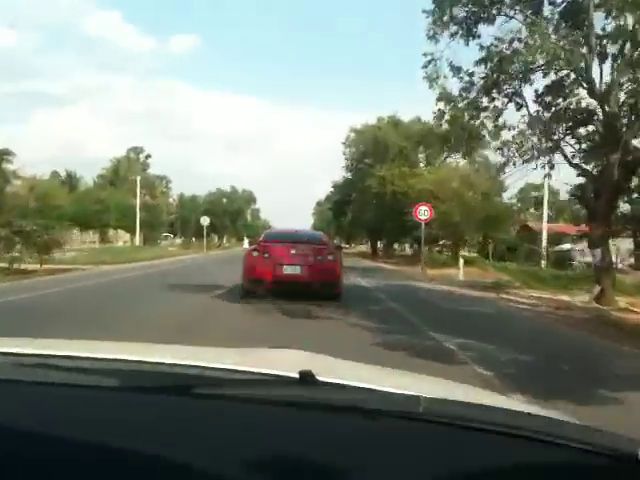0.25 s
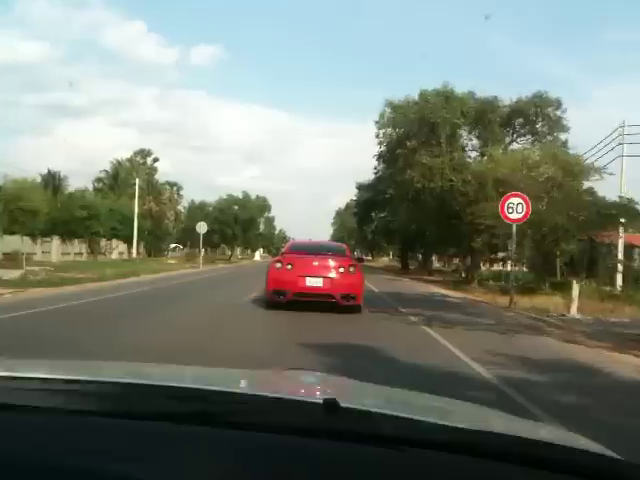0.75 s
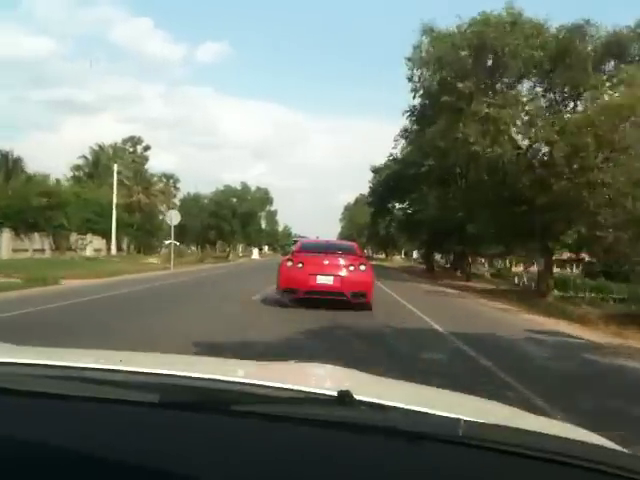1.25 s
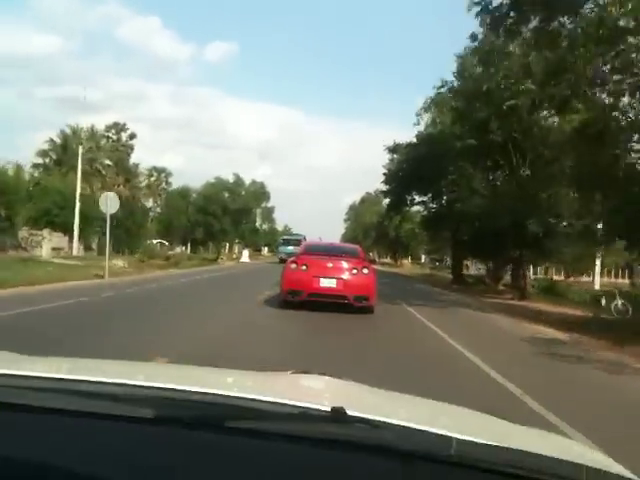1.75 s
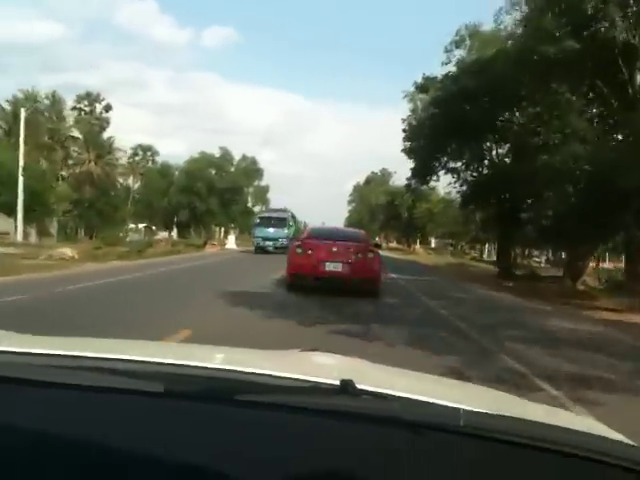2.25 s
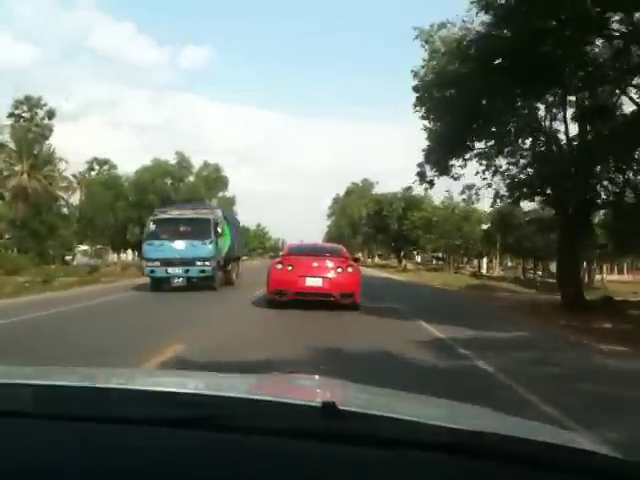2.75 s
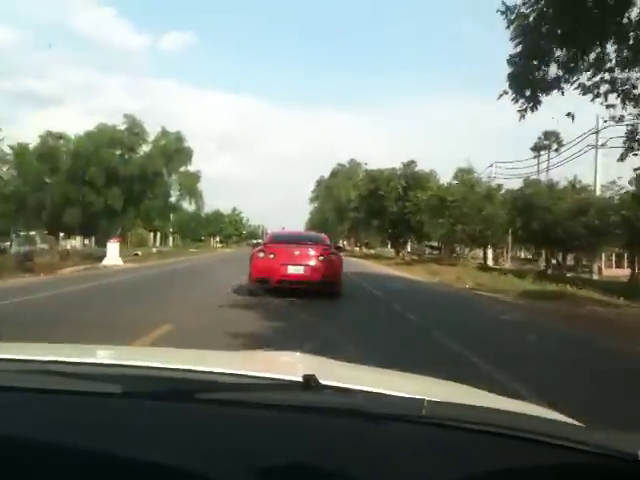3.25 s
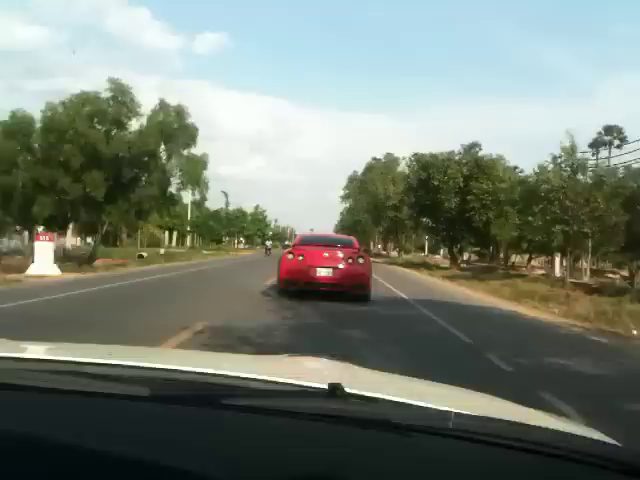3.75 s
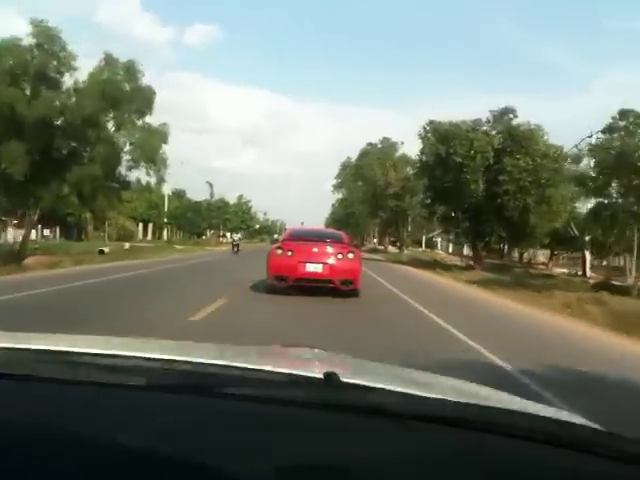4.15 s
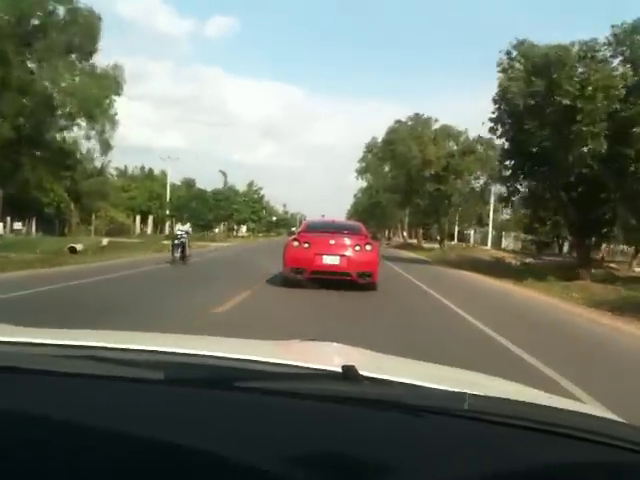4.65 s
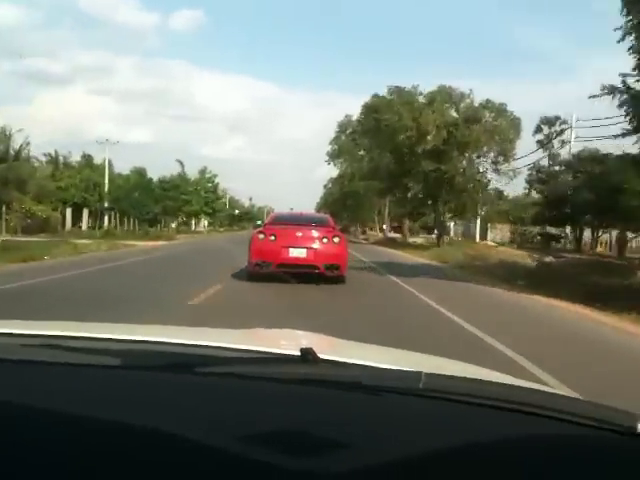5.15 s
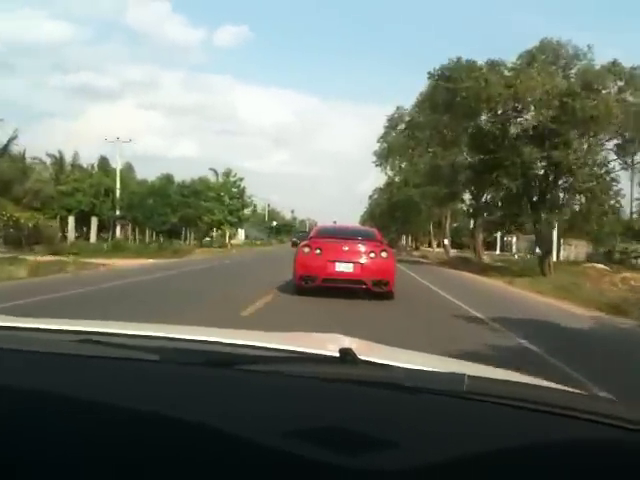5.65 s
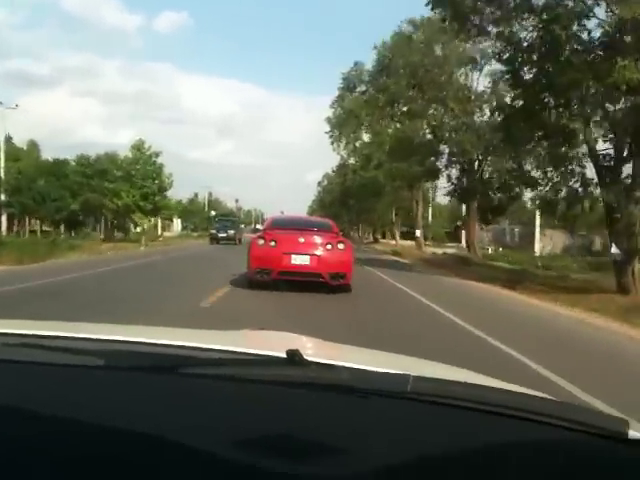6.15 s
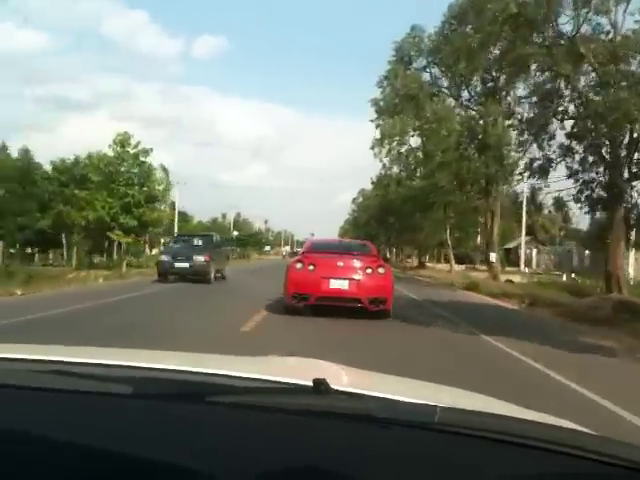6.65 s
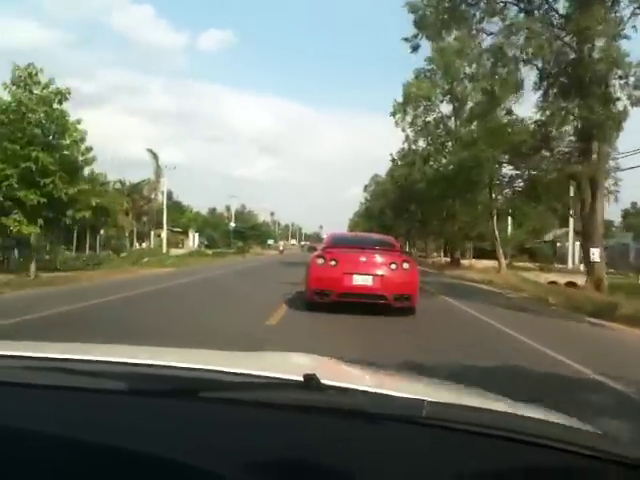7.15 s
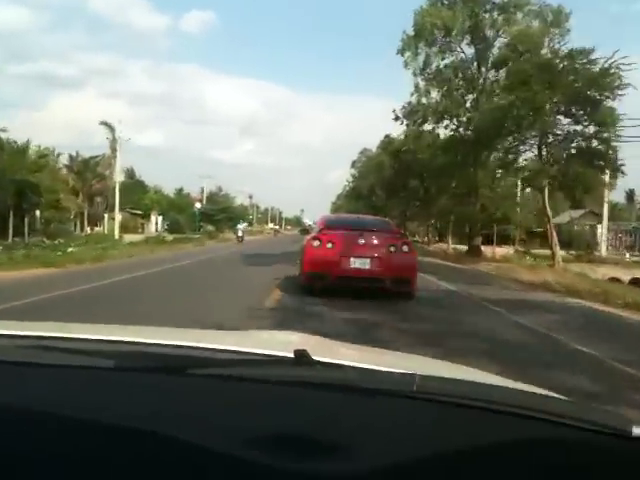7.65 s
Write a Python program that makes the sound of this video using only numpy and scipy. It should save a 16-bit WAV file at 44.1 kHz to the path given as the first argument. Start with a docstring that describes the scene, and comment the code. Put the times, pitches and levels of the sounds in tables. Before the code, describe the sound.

Car cabin on a country road: droning engine slowly rising in pitch, soft tyre roar, irregular thumps, suspension knocks and small trim ticks.

```python
"""Car interior on a country road

Inside a car that gathers a little speed, the engine hums in harmonics of its firing rate and a gear whines.
Tyres rumble and hiss as shaped noise; rough patches of asphalt excite short, heavily damped body jolts.
Suspension contacts clack, panels crack together, and hard trim snaps, ticks and rubs as it slips.
A few puffs of air, enveloped noise, cross the microphone."""
import sys
import numpy as np
from scipy import signal
from scipy.fft import rfft, irfft, next_fast_len
from scipy.io import wavfile
from scipy.ndimage import uniform_filter1d, map_coordinates

SR = 44100
rng = np.random.default_rng(int(sys.argv[2]) if len(sys.argv) > 2 else 0)


def wav_out(sig):
    """Save sig, one row per channel (or a flat mono array), as 16-bit PCM at SR to the path in sys.argv[1]."""
    wavfile.write(sys.argv[1], SR, np.round(np.clip(np.atleast_2d(sig).T, -1, 1) * 32767).astype(np.int16))


N = 348814  # samples


def amp(db):
    """Decibels to amplitude ratio."""
    return 10 ** (np.asarray(db) / 20)


def unit(x):
    """Normalisation to an rms of 1."""
    return x / np.sqrt(np.mean(x ** 2) + 1e-20)


def curves(rows):
    """Linear interpolation in time: one value per sample for each column after the time."""
    s, *columns = np.transpose(rows)
    t = np.arange(N) / SR
    return [np.interp(t, s, column) for column in columns]


def wobble(rate):
    """Slow random modulation: a smooth curve through random knots, rate knots a second."""
    knots = rng.standard_normal(int(N * rate / SR) + 4)
    return map_coordinates(knots, [np.arange(N) * rate / SR])


def filtered(x, response):
    """Linear filtering: the spectrum of x times a response of frequency."""
    size = next_fast_len(len(x) + 8192)
    spectrum = rfft(x, size) * response(np.fft.rfftfreq(size, 1 / SR))
    return irfft(spectrum, size)[:len(x)]


def coloured(x, spectrum):
    """Spectral shaping: x weighted by a (Hz, dB) curve on a log frequency axis, at rms 1."""
    knot_hz, db = np.transpose(spectrum)
    return unit(filtered(x, lambda hz: amp(np.interp(np.log(hz + 1), np.log(knot_hz), db))))


def high_pass(x, edge_hz, order):
    """A causal Butterworth low cut."""
    return signal.sosfilt(signal.butter(order, edge_hz, "high", fs=SR, output="sos"), x)


def band_pass(x, low_hz, high_hz, order):
    """A causal Butterworth band filter."""
    return signal.sosfilt(signal.butter(order, [low_hz, high_hz], "band", fs=SR, output="sos"), x)


def patchy(x, depth_db):
    """Independent band modulation: each region of a noise in time and frequency flutters on its own."""
    cells = signal.stft(x, nperseg=512)[2]
    across_bands = uniform_filter1d(rng.standard_normal(cells.shape), size=4, axis=0)
    flutter = unit(uniform_filter1d(across_bands, size=7, axis=1))
    return unit(signal.istft(cells * amp(depth_db * flutter), nperseg=512)[1][:N])


def add(track, s, sound):
    """Superposition: mix a sound into the track from time s."""
    part = track[max(round(s * SR), 0):][:len(sound)]
    part += sound[:len(part)]


# Engine firing rate: start_s, firing_hz
FIRING = [(0, 90.6), (1.7, 91.3), (2.7, 92.6), (3.7, 94.7), (4.7, 96.8), (5.5, 97.6), (7, 97.7),
          (7.9, 98.4)]
# Engine hum: start_s, firing_tone_db, octave_db, twelfth_db
HUM = [(0, -45.5, -39.5, -36), (1.3, -47, -32.5, -52.5), (2.2, -44.5, -36.5, -42.5),
       (3.0, -43, -35.5, -42.5), (3.55, -42, -41.5, -36), (4.3, -38.5, -43, -37), (5, -38.5, -40, -38),
       (6.3, -41.5, -38.5, -43), (7.9, -38.5, -39, -42)]
# Weaker engine tones: multiple (of the firing rate), level_db
OVERTONES = [(1.5, -43.5), (4, -58), (5, -53)]
# Gear whine: start_s, level_db
WHINE = [(0, -58.5), (3.4, -64.5), (3.9, -56), (5.1, -54), (6.5, -57), (7.9, -56.5)]


def engine(waver_db=1.4, drift=0.2, whine_waver_db=2.5, whine_drift=0.66, drone_db=-7, drone_drift=0.81):
    """Phase locking: tones ride on the crankshaft's turning; a tyre drone beats slowly with their octave."""
    turns = np.cumsum(curves(FIRING)[0]) / SR  # firing periods elapsed
    gear, tread = 12.65, 2.045  # multiples of the firing rate
    hum = curves(HUM)
    out = np.zeros(N)
    for multiple, db in [*enumerate(hum, 1), *OVERTONES]:
        # drifts are in radians
        phase = 2 * np.pi * (multiple * turns + rng.random()) + drift * multiple * wobble(11)
        waver = amp(waver_db * np.sqrt(multiple) * wobble(11))
        out += amp(db) * unit(waver * np.sin(phase))
    drone = unit(np.sin(2 * np.pi * tread * turns + drone_drift * wobble(4)))
    whine_waver = amp(whine_waver_db * wobble(18))
    whine = unit(whine_waver * np.sin(2 * np.pi * gear * turns + whine_drift * wobble(15)))
    return out + amp(hum[1] + drone_db) * drone + amp(curves(WHINE)[0]) * whine


# Coarseness of the asphalt: start_s, coarseness_db (before the rumble and knock gains)
ROAD = [(0, -27), (.5, -28), (.85, -28.5), (1.5, -30), (2.25, -30.5), (2.6, -31.5), (3.7, -30), (4.45, -28),
        (4.7, -25), (4.98, -22), (5.17, -29.5), (5.55, -23.5), (5.85, -29), (6.5, -27.5), (7.4, -25),
        (7.91, -27.5)]
# Relative spectrum of the shaken body: frequency_hz, density_db (per Hz)
RUMBLE = [(25, -48.5), (45, -22.5), (70, -17.5), (100, -3.5), (130, 2.5), (175, 1.5), (230, -4.5),
          (320, -3.5), (430, -7), (600, -15.5), (900, -26), (2000, -45.5), (4000, -92)]


def road(rumble_db=-8, knock_db=-8.5, knock_growth=1.26, spread_db=4, boom_hz=180, boom_db=-15,
         uneven_db=2.5, patch_db=-14, patch_s=0.018):
    """Random excitation: coarse asphalt gives rumble and sparse knocks, which ring the cabin air's resonance."""
    t = np.arange(N) / SR
    asphalt = amp(curves(ROAD)[0] + uneven_db * wobble(28))
    # a broken patch surrounds each big bump
    patches = sum(amp(db + patch_db) * np.exp(-np.abs(t - s) / patch_s) for s, db, _ in JOLTS)
    rough_db = 20 * np.log10(np.hypot(asphalt, patches))
    usual_db = np.mean(rough_db)
    rumble = amp(rough_db + rumble_db) * coloured(rng.standard_normal(N), RUMBLE)

    hits = rng.random(N) < 110 / SR  # 110 a second on average
    signs = rng.choice([-1, 1], N)
    stones = hits * signs * amp(spread_db * rng.uniform(-0.79, 1, N))
    # knocks gain level faster than the roughness does
    knocking_db = usual_db + knock_growth * (rough_db - usual_db) + knock_db
    knocks = amp(knocking_db) * coloured(stones, RUMBLE)

    shaking = high_pass(rumble + knocks, 69, order=2)
    half_width_hz = 9
    boom = filtered(shaking, lambda hz: 1 / (1 + 1j * (hz - boom_hz) / half_width_hz))
    return shaking + amp(usual_db + boom_db) * unit(boom)


# Big bumps: start_s (moment of the peak), peak_db (nominal, before the gain), pitch_hz (at the peak)
JOLTS = [(0.0597, -12.5, 234.3), (0.0875, -14, 207), (0.1271, -17, 322), (0.1475, -17.5, 230),
         (0.2568, -17, 309), (0.3271, -22.5, 224), (0.3392, -11.5, 232.4), (0.4215, -20, 183),
         (0.602, -11, 271.7), (0.8275, -14.5, 283.2), (0.8971, -16, 187), (0.9313, -12.5, 260.4),
         (0.9979, -22, 178), (1.023, -9, 216), (1.2306, -17.5, 253.4), (1.2469, -20.5, 199),
         (1.2884, -22, 186), (1.3845, -19, 199.3), (1.4175, -12.5, 197.6), (1.53, -18, 211),
         (1.557, -13.0, 227.8), (1.5948, -19, 216.5), (1.6535, -19.0, 189.6), (1.7604, -15.5, 203.7),
         (2.089, -18, 200), (2.1131, -18, 256.5), (2.266, -19, 202.6), (2.3696, -20, 206.6),
         (2.6596, -17, 213), (3.0686, -16.5, 287), (3.8974, -16, 284.5), (4.1219, -19, 331.4),
         (4.3101, -15.5, 213), (4.4057, -14.5, 275), (4.4182, -13, 288), (4.4425, -21, 222),
         (4.5543, -15.5, 275), (4.5748, -8, 243), (4.5872, -15.5, 251), (4.602, -15, 228.6),
         (4.6692, -14.5, 270), (4.6911, -14.5, 220.3), (4.7119, -11.5, 360), (4.7407, -13, 301.5),
         (4.7999, -13.5, 234), (4.8216, -9.5, 259), (4.9225, -14.5, 222), (4.967, -10, 213.6),
         (4.981, -15, 277.6), (5.0765, -11.5, 207), (5.0895, -16.5, 246), (5.1904, -12.5, 313.8),
         (5.2837, -13, 255), (5.301, -10, 261), (5.3472, -14.5, 260.4), (5.3623, -11, 223),
         (5.4284, -13.5, 221.6), (5.456, -12.5, 245), (5.4908, -12.5, 330.6), (5.5031, -10.5, 216),
         (5.5167, -8.5, 202.7), (5.5838, -11.5, 282), (5.6387, -9.0, 279), (5.657, -11.5, 238.6),
         (5.682, -15.5, 232.4), (5.7328, -11.5, 203.7), (5.748, -9.5, 270), (5.8562, -18.5, 259),
         (5.8973, -7, 247.7), (6.0317, -20, 242), (6.0529, -9, 218.8), (6.092, -16, 214),
         (6.1676, -27, 195), (6.1853, -11.5, 284), (6.2128, -19, 213.3), (6.3281, -18.5, 218),
         (6.4292, -15, 227.6), (6.4488, -20, 206), (6.464, -16, 199.4), (6.481, -20, 205),
         (6.5037, -15, 348), (6.519, -23.5, 206), (6.5596, -10.5, 223), (6.7765, -14, 223),
         (6.8038, -21.5, 233), (6.9463, -19, 170), (6.9631, -19.5, 200), (6.9786, -20, 193),
         (7.0604, -18.5, 185), (7.0754, -14, 219.5), (7.135, -16.5, 218), (7.15, -19.5, 209),
         (7.2114, -14, 251), (7.227, -14, 211.7), (7.4401, -16, 226), (7.4552, -14, 230),
         (7.469, -12.5, 213.3), (7.4837, -14.5, 177), (7.5101, -20, 216), (7.5427, -13.5, 168.6),
         (7.6503, -13.5, 208.3), (7.6664, -4.5, 239.3), (7.7294, -16.5, 287), (7.7695, -9.5, 244),
         (7.8023, -8.5, 291), (7.826, -11, 319)]


def jolts(gain_db=-0.64, rise_s=0.0018, decay_s=0.0031, sag=0.248, shudder_db=-16, shudder_s=0.01, low_hz=100):
    """Heavy damping: each bump flexes a panel for two or three swings, and the body shudders around it."""
    lead_s = .04  # room before the peak
    t = np.arange(SR // 8) / SR - lead_s
    shape = np.exp(-np.hypot(np.where(t < 0, t / rise_s, t / decay_s), .4))
    shape /= shape.max()
    out = np.zeros(N)
    for s, db, hz in [*JOLTS, *lesser_bumps()]:
        sinking_hz = hz * (1 - sag * np.tanh(t / decay_s))  # the low part lags
        turns = np.cumsum(sinking_hz) / SR + rng.random()
        flex = shape * np.sin(2 * np.pi * turns)
        body = coloured(rng.standard_normal(len(t)), RUMBLE)
        shudder = amp(shudder_db) * np.exp(-np.abs(t) / shudder_s) * body
        add(out, s - lead_s, amp(db + gain_db) * (flex + shudder))
    return high_pass(out, low_hz, order=4)


def lesser_bumps(bumps_per_s=6, bump_db=1, bump_hz=270, scatter_db=2, scatter_octaves=0.24):
    """Jittered chance: rows of (start_s, peak_db, pitch_hz), stronger where the asphalt is coarse."""
    draw = rng.uniform(-1, 1, (round(bumps_per_s * N / SR), 3))
    slot = np.arange(len(draw)) + .5 + .5 * draw[:, 0]  # one bump somewhere in each equal slot
    s = slot / len(draw) * N / SR
    db = np.interp(s, *np.transpose(ROAD)) + bump_db + scatter_db * draw[:, 1]
    hz = bump_hz * 2 ** (scatter_octaves * draw[:, 2])
    return np.column_stack([s, db, hz])


# Hard suspension contacts: start_s (moment of the peak), peak_db (nominal, before the gain), pitch_hz (at the peak)
CLACKS = [(0.056,-23.5,760), (0.127,-29,565), (0.3344,-22,581), (0.5995,-27,563), (0.824,-30,522),
          (0.9285,-27,519), (1.0291,-25,630), (4.1213,-26,655), (4.411,-26,526), (4.5516,-25,567),
          (4.5707,-24,638), (4.6962,-20.5,608), (4.716,-20,640), (4.741,-25,762), (4.809,-27,530),
          (4.9127,-22,564), (4.9827,-25,587), (5.0814,-25,634), (5.193,-25.5,604), (5.283,-19,578),
          (5.3015,-23,612), (5.394,-15.5,577), (5.4559,-24,604), (5.4848,-27,516), (5.4935,-20,626),
          (5.5128,-24,761), (5.558,-22,526), (5.6391,-19,583), (5.6534,-17,570), (5.73,-17.5,616),
          (5.8926,-30,626), (6.4585,-26,644), (6.5,-20,538), (6.6201,-23.5,580), (6.7753,-25.5,616),
          (6.848,-33,617), (7.2225,-25,704), (7.4599,-26,593), (7.6569,-16.5,666), (7.666,-17,650),
          (7.7713,-23,633), (7.7791,-18,537), (7.8011,-25,670), (7.8106,-18,660), (7.8267,-19,634)]


def clacks(gain_db=-1.1, rise_s=0.00088, decay_s=0.0016, sag=0.1514, overtone=1.65, overtone_db=-13):
    """Cushioned impact: rubber-damped suspension contacts swing quickly a few times, sinking in pitch."""
    lead_s = .02  # room before the peak
    t = np.arange(SR // 16) / SR - lead_s
    shape = np.exp(-np.hypot(np.where(t < 0, t / rise_s, t / decay_s), .5))
    shape /= shape.max()
    out = np.zeros(N)
    for s, db, hz in CLACKS:
        sinking_hz = hz * (1 - sag * np.tanh(t / decay_s))
        turns = np.cumsum(sinking_hz) / SR + rng.random()
        ring = np.sin(2 * np.pi * turns) + amp(overtone_db) * np.sin(2 * np.pi * overtone * turns)
        add(out, s - lead_s, amp(db + gain_db) * shape * ring)
    return out


# Panels knocked together: start_s, peak_db, highest_hz
CRACKS = [(0.055, -26, 3200), (5.493, -28, 1800), (7.6658, -24, 6000), (7.811, -25, 2200)]


def cracks(contact_s=0.00019, low_hz=600, ring_hz=1700, ring_s=0.00039, ring_db=-3):
    """Brief contact: panels knock on hard jolts, one dry, sharp push and a swing or two of the plastic."""
    t = np.arange(SR // 16) / SR
    push = np.exp(-t / contact_s)
    swing = amp(ring_db) * np.exp(-t / ring_s) * np.sin(2 * np.pi * ring_hz * t)
    out = np.zeros(N)
    for s, db, high_hz in CRACKS:
        crack = band_pass(push + swing, low_hz, high_hz, order=2)
        add(out, s, amp(db) * crack / np.abs(crack).max())
    return out


# Plastic trim snap (catch, release, ring, settling): start_s, level_db (rms before the envelope), t60_s, lowest_hz
SNAP = [(0.2193, -20, 0.012, 500), (0.221, -23, 0.016, 1600), (0.222, -26.5, 0.055, 2800),
        (0.2438, -59, 0.04, 3500)]
# Trim resonances: centre_hz, width_hz, level_db
TRIM = [(1700, 1240, -2.5), (2900, 1000, -1.5), (4080, 750, 1), (5900, 1000, 1), (6930, 650, 6),
        (8100, 1100, 1.5), (9300, 840, 3), (11000, 1600, -6), (12700, 900, -1), (14600, 1400, -5)]


def snap(rise_s=0.00028):
    """Modal resonance: trim snaps under strain, and an uneven run of slips rings its modes briefly."""
    t = np.arange(SR // 8) / SR

    def plastic(hz):
        """Sum of damped modes with alternating sign."""
        total = 0
        for k, (centre, width, db) in enumerate(TRIM):
            damping = 1j * hz * width
            total = total + (-1) ** k * amp(db) * damping / (centre * centre - hz * hz + damping)
        return total

    out = np.zeros(N)
    for s, db, t60, low_hz in SNAP:
        slips = rng.standard_normal(len(t))
        ring = unit(high_pass(filtered(slips, plastic), low_hz, order=6))
        add(out, s, amp(db - 60 * t / t60) * (1 - np.exp(-t / rise_s)) * ring)
    return out


# Small trim ticks: start_s, peak_db, lowest_hz, highest_hz
TICKS = [(2.213, -48, 7000, 14000), (4.445, -58, 4950, 13800), (5.247, -34, 6600, 9000),
         (6.309, -49, 8000, 11100), (6.313, -41.5, 8860, 12100), (6.353, -44.5, 8740, 12000),
         (6.3547, -44, 8800, 12100), (6.363, -51.5, 8800, 11900), (6.3816, -28.5, 8900, 10800),
         (6.4075, -42.5, 9000, 12000)]


def ticks(rustle_db=-35, rustle_t60_s=.04):
    """Impulse response: each small slip of the trim is a thin band-limited click with a faint rustle behind."""
    t = np.arange(SR // 8) / SR
    out = np.zeros(N)
    for s, db, low_hz, high_hz in TICKS:
        rustle = amp(rustle_db - 60 * t / rustle_t60_s) * rng.standard_normal(len(t))
        slip = (t == 0) + rustle
        click = band_pass(high_pass(slip, low_hz, order=8), low_hz, high_hz, order=1)
        add(out, s, amp(db) * click / np.abs(click).max())
    return out


# Faint rubs of the trim: start_s (moment of the peak), level_db, fade_s (time constant on either side)
RUBS = [(1.83, -72, .02), (2.213, -66, .008), (3.05, -71, .012), (3.22, -71, .015), (3.687, -65, .022),
        (3.97, -72, .01), (4.442, -69, .012), (7.62, -66, .012)]
# Relative spectrum of their thin rustle: frequency_hz, density_db (per Hz)
RUB = [(2500, -25), (7000, -1), (11000, 0), (16000, -9)]


def rubs(grit_db=3):
    """Sliding friction: trim parts move a little against each other in a short, faint, grainy rustle."""
    t = np.arange(N) / SR
    swells = sum(amp(db) * np.exp(-np.abs(t - s) / fade_s) for s, db, fade_s in RUBS)
    grains = amp(grit_db * wobble(400)) * rng.standard_normal(N)
    return swells * coloured(grains, RUB)


# Relative spectrum of the tyre roar: frequency_hz, density_db (per Hz)
TYRES = [(60, -27), (150, 7.5), (450, 2), (650, -3), (850, 0), (1050, -2), (1250, -7), (1430, -4),
         (1650, -9), (2000, -11.5), (2500, -22.5), (3300, -33), (6000, -63)]
# Relative spectrum of the air hiss: frequency_hz, density_db (per Hz)
AIR = [(1000, -13), (2800, -0.5), (3400, -1.5), (3900, 0), (5200, -1), (6200, -7.5), (8000, -8.5),
       (9500, -13), (11500, -14.5), (13000, -20), (16000, -22)]


def rush(tyre_db=-40.0, air_db=-62, flutter_db=0.48, tyre_db_per_octave=6):
    """Broadband noise: tyre roar through the doors grows with speed; air hisses over the windscreen."""
    firing, = curves(FIRING)
    roar_db = tyre_db + tyre_db_per_octave * np.log2(firing / firing.mean())
    roar_level = amp(roar_db + flutter_db * wobble(14))
    tyres = roar_level * patchy(coloured(rng.standard_normal(N), TYRES), depth_db=1.15)
    air_level = amp(air_db + 0.5 * wobble(6))
    air = air_level * patchy(coloured(rng.standard_normal(N), AIR), depth_db=1.15)
    return tyres + air


# Air puffs: start_s (moment of the peak), edge_db (breezy), push_db (low), fade_s (time constant of the edge)
PUFFS = [(6.57, -37, -24.5, 0.046), (6.952, -34, -26, 0.03), (7.069, -35, -30, 0.033)]
# Relative spectrum of the breezy edge: frequency_hz, density_db (per Hz)
PUFF = [(25, -24), (60, -11), (115, 8), (220, -14), (400, -2), (2000, -17.5), (4000, -31.5), (7000, -31),
        (11000, -41), (16000, -42)]


def puffs(grit_db=2.5, push_hz=118, push_width_hz=40, push_lasts=1.75, rise_share=0.47):
    """Turbulence: eddies rise faster than they fade, a sputtering edge within a longer low push."""
    t = np.arange(N) / SR

    def swell(s, fade_s):
        """Exponential rise and slower fall about time s."""
        return np.exp(-np.abs(t - s) / np.where(t < s, rise_share * fade_s, fade_s))

    edges = sum(amp(db) * swell(s, fade_s) for s, db, _, fade_s in PUFFS)
    pushes = sum(amp(db) * swell(s, push_lasts * fade_s) for s, _, db, fade_s in PUFFS)
    breeze = coloured(amp(grit_db * wobble(220)) * rng.standard_normal(N), PUFF)
    low_band = lambda hz: np.exp(-((hz - push_hz) / push_width_hz) ** 2)
    push = unit(filtered(rng.standard_normal(N), low_band))
    return edges * breeze + pushes * push


def scene():
    """Superposition: everything heard from behind the windscreen."""
    vehicle = engine() + road() + jolts() + clacks() + cracks() + rush()
    trim = snap() + ticks() + rubs()
    return (vehicle + trim + puffs())[None]


def record(dry):
    """Band limitation: the microphone's response slopes to nothing across its upper edge."""
    top_hz, edge_hz = 15850, 500  # middle and width of the slope
    return filtered(dry[0], lambda hz: np.clip((top_hz - hz) / edge_hz + .5, 0, 1))[None]


dry = scene()
out = record(dry)
wav_out(out)
```